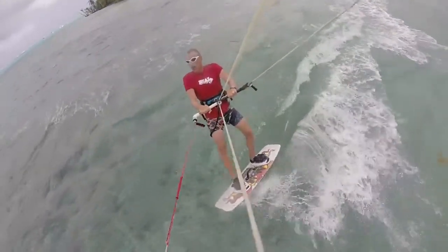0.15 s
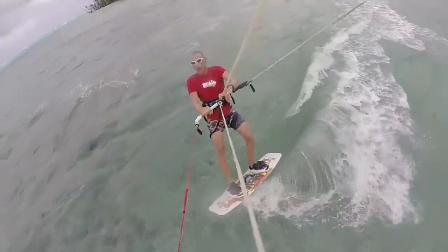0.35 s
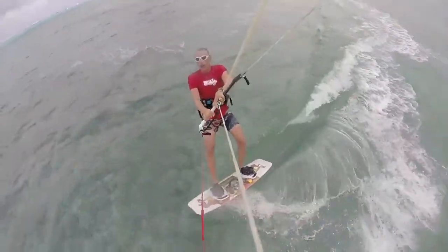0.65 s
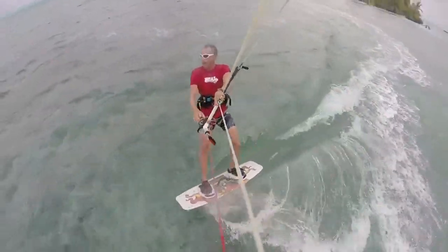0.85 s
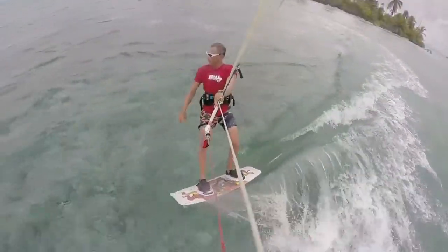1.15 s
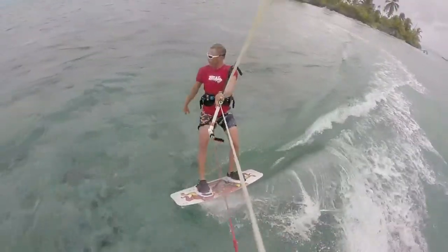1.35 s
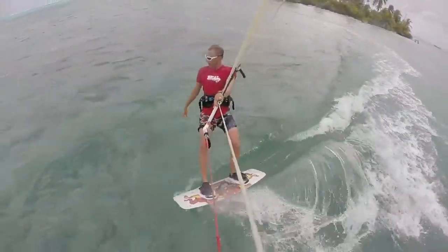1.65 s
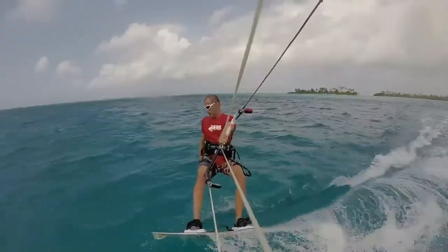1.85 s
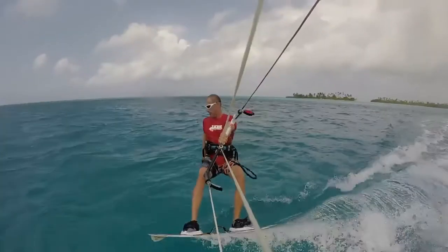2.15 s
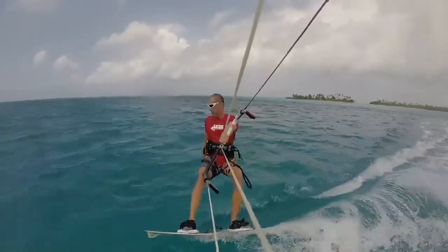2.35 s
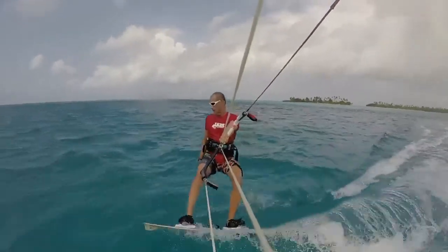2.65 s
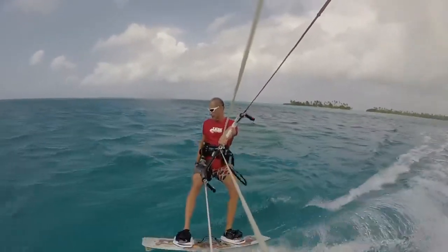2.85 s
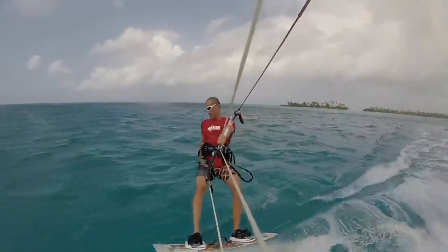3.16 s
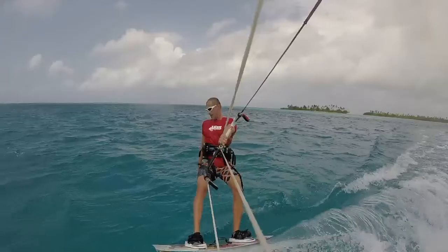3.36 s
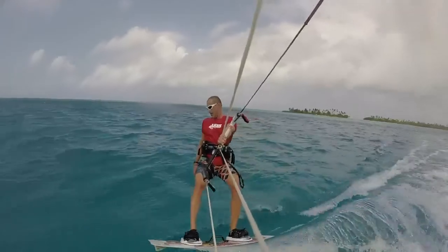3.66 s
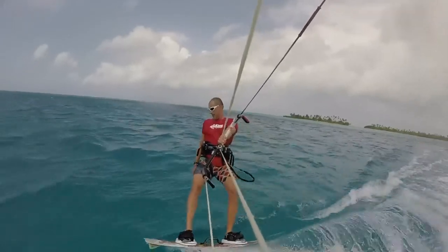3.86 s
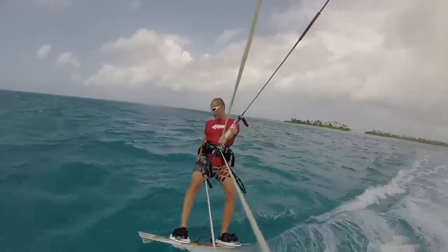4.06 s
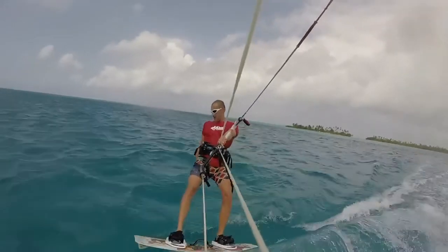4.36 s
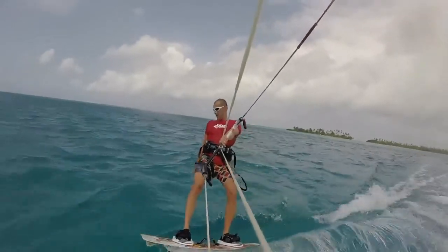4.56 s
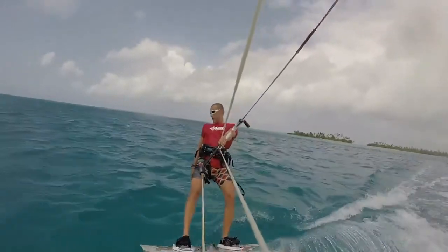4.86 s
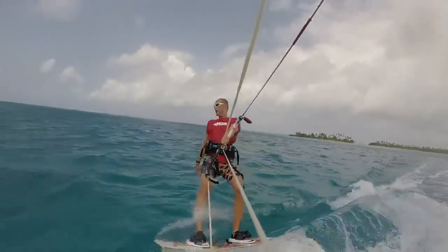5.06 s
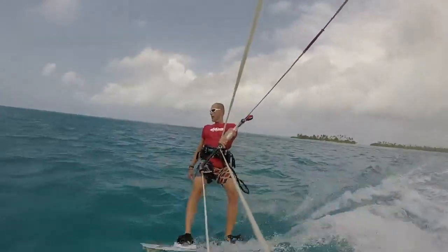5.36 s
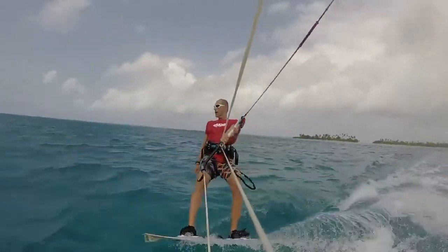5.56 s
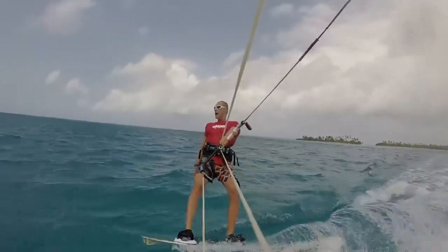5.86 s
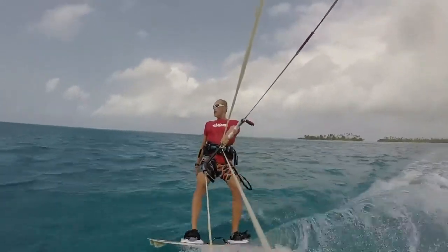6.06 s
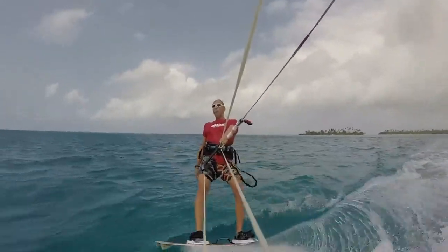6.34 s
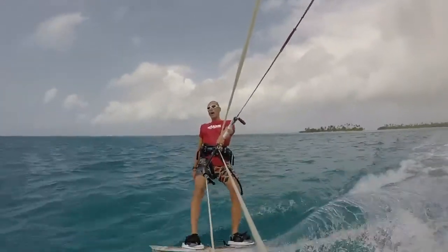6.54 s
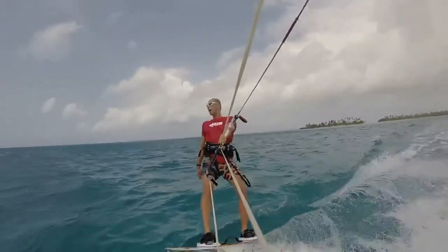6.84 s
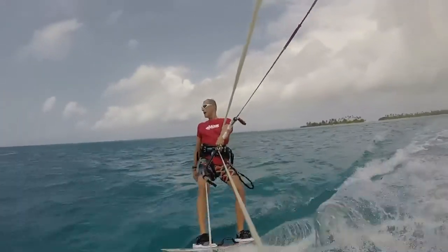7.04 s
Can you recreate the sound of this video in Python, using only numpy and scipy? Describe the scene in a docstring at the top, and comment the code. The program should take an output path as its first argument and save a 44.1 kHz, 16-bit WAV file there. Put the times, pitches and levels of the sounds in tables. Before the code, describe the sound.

Outdoors over open water, a small housed camera on kite lines catches the wind. First, low rumble and dull thumps dominate, with a knock or two from the mount, a faint breathy whistle and hissing spray. A sudden cut brings a louder, wavering whistle in two layers, breathy below and clearer above, over continued buffeting. The whistle slowly sinks as splashes swell in the hiss.

```python
"""Whistling kite lines in a sea wind

Wind over a small housed camera hung on taut kite lines above the sea, in mono.
A thick and a thin line whistle as gliding bands of noise that follow the air speed; part of the thin one
locks to a clear tone. Gusts buffet the housing with low noise and short low swings, tugs ring the mount,
spray hisses in swelling bands, a few drops tick. A cut leads from a calmer stretch to a windier one."""
import sys
import numpy as np
from scipy import signal
from scipy.fft import rfft, irfft
from scipy.io import wavfile
from scipy.ndimage import uniform_filter1d, map_coordinates

SR = 44100
rng = np.random.default_rng(int(sys.argv[2]) if len(sys.argv) > 2 else 0)


def put_to_file(sound):
    """Save the sound as 16-bit audio at rate SR, in the file named by the first command-line argument."""
    columns = np.atleast_2d(sound).T  # one column per channel
    safe = np.clip(columns, -1, 1)
    whole_steps = np.round(safe * 32767)
    wavfile.write(sys.argv[1], SR, whole_steps.astype(np.int16))


N = 317520

CUT_S = 1.755
USUAL_HZ = 2000   # thin line pitch that stands for the usual air speed
# The wind freshens in the calm stretch: [t/s, thin line shedding f/Hz, thick line level/dB, thin line level/dB]
CALM_WIND = [(0, 1410, -31.5, -61), (.3, 1510, -31, -59), (1.1, 1592, -25, -54), (1.38, 1631, -24.5, -43),
             (1.75, 1674, -23, -42)]


def from_db(db):
    """Decibels to gain."""
    return 10 ** (np.asarray(db) / 20)


def rms_one(x):
    """Scale to unit rms."""
    return x / np.sqrt(np.mean(x ** 2) + 1e-20)


def in_time(rows):
    """Draw straight lines through the columns of a timed table, one value per sample."""
    s, *columns = np.transpose(rows)
    return [np.interp(np.arange(N) / SR, s, column) for column in columns]


def across_cut(calm, windy):
    """The calm stretch before the cut, the windy one after, joined within two milliseconds."""
    after = np.clip((np.arange(N) / SR - CUT_S) / .002, 0, 1)
    return (1 - after) * calm + after * windy


def drift(rate_hz):
    """Slow chance: noise twice through a one-pole low-pass at a coarse rate; spread 1."""
    step, settle = 40, 2000   # samples per coarse point; coarse points dropped while the filter settles
    pole = np.exp(-2 * np.pi * rate_hz * step / SR)
    noise = rng.standard_normal(N // step + settle + 2)
    slow = signal.lfilter([1], [1, -2 * pole, pole ** 2], noise)[settle:]
    return np.interp(np.arange(N) / step, np.arange(len(slow)), rms_one(slow - slow.mean()))


def coloured(spectrum, size, rate):
    """Noise shaped by a spectrum, joined straight over log frequency and near silent outside; rms 1."""
    points = np.array(spectrum)
    freq = np.fft.rfftfreq(size, 1 / rate)[1:]
    level_db = np.interp(np.log(freq), np.log(points[:, 0]), points[:, 1], left=-150, right=-150)
    gain = np.r_[0, from_db(level_db)]   # no DC
    return rms_one(irfft(rfft(rng.standard_normal(size)) * gain, size))


def shedding(hz, spread):
    """Noise laid out per shedding cycle and read at the pace of the wind, so the whole band glides."""
    per_cycle = 16   # noise points in one shedding cycle
    wake = coloured(spread, 2 ** 18, per_cycle)
    position = np.cumsum(hz) / SR * per_cycle
    return map_coordinates(wake, [position], order=3, mode="wrap")


def bell(s, length):
    """Bell-shaped swell about a time; length in seconds is its full width at half height."""
    return .5 ** ((2 * (np.arange(N) / SR - s) / length) ** 2)


def bursts(rows, lengths):
    """Sine swings under a bell about each time, phase by chance."""
    t, out = np.arange(N) / SR, np.zeros(N)
    phases = rng.random(len(rows))   # turns
    for (s, peak_db, hz), length, phase in zip(rows, lengths, phases):
        out += from_db(peak_db) * bell(s, length) * np.sin(2 * np.pi * (hz * (t - s) + phase))
    return out


def windy_air():
    """Air speed of the windy stretch: thin line pitch, its moving mean and its eddies in dB about usual."""
    # Air speed as heard in the thin line: [t/s, shedding f/Hz]
    windy_pitch = [(1.76, 2090), (1.9, 2135), (2.09, 2140), (2.2, 2040), (2.33, 2075), (2.42, 1930),
                   (2.48, 1930), (2.57, 2120), (2.66, 2030), (2.8, 2035), (2.98, 2100), (3.14, 2020),
                   (3.27, 2125), (3.38, 2015), (3.45, 2040), (3.55, 1945), (3.83, 1925), (3.94, 2058),
                   (4.05, 1935), (4.17, 2030), (4.37, 1790), (4.48, 1947), (4.93, 1765), (5.05, 1900),
                   (5.14, 1753), (5.38, 1760), (5.49, 1929), (5.6, 1800), (5.82, 1846), (5.95, 1703),
                   (6.1, 1860), (6.45, 1770), (6.8, 1800), (7.0, 1720), (7.2, 1790)]
    half_window_s = .4
    hz, = in_time(windy_pitch)
    air_db = 20 * np.log10(hz / USUAL_HZ)
    mean_db = uniform_filter1d(air_db, size=int(2 * half_window_s * SR), mode="nearest")
    return hz, mean_db, air_db - mean_db


def thick_line():
    """A broad breathy whistle, steep below its pitch, trailing above; light wind sheds less evenly."""
    # Spread of shedding along the line: [multiple of shedding pitch, relative density/dB]
    thick_spread = [(.6, -39), (.72, -29), (.85, -3.5), (1.0, 1), (1.15, -6), (1.35, -18), (1.55, -25),
                    (1.9, -25.5), (2.4, -57)]
    # Level in the mean wind of the windy stretch: [t/s, level/dB]
    thick_windy = [(1.76, -14), (2.4, -16), (3.3, -15), (3.75, -17), (4.2, -17), (4.7, -17.5), (5.3, -19.5),
                   (6.3, -18.5), (7.2, -21)]
    pitch_ratio = 0.5   # to the thin line
    pitch_per_mean, pitch_per_eddy = 1.15, 0.482   # dB of pitch per dB of air speed
    level_per_eddy = 3.1   # dB of level per dB of air speed
    calm_hz, calm_db, _ = in_time(CALM_WIND)
    _, mean_db, eddy_db = windy_air()

    windy_hz = USUAL_HZ * from_db(pitch_per_mean * mean_db + pitch_per_eddy * eddy_db)
    hz = pitch_ratio * across_cut(calm_hz, windy_hz)
    hz = hz * (1 + .02 * drift(6))   # small eddies shake the air speed
    level_db = across_cut(calm_db, in_time(thick_windy)[0] + level_per_eddy * eddy_db)
    level_db = level_db + 0.94 * drift(7.6) + 1.05 * drift(42)

    calm_spread = [(multiple ** 1.044, density_db) for multiple, density_db in thick_spread]   # wider
    wake = across_cut(shedding(hz, calm_spread), shedding(hz, thick_spread))
    return from_db(level_db) * wake


def thin_line():
    """A narrower whistle; at times the line swings along and part of the shedding locks to a clear tone."""
    # Shedding of two strands side by side: [multiple of shedding pitch, relative density/dB]
    thin_spread = [(.82, -42), (.92, -18.5), (.955, -0.5), (1.002, -6), (1.045, -0.5), (1.086, -11.5),
                   (1.2, -26.5), (1.45, -46)]
    # The line swings along: [t/s, length/s, pitch over shedding, locked share of power 0-1, whole line gain/dB]
    locks = [(1.3, .16, .96, .4, 3), (1.8, .3, 1.02, .45, 1), (2.06, .28, 1.008, .7, 2),
             (2.31, .32, .985, .75, 2), (2.6, .32, 1.03, .55, -1.5), (3.16, .28, 1, .55, 2.5),
             (3.48, .32, .985, .6, 3), (3.96, .17, .985, .6, 3), (4.43, .14, 1, .4, 1.5),
             (5.1, .34, .993, .5, 3), (5.86, .22, 1, .45, 3), (7.05, .14, .985, .3, 1.5)]
    lock_edge_s = 0.036
    usual_db = -27   # windy stretch at the usual pitch, before locks and drift
    level_per_mean, level_per_eddy = 6.2, 1.8   # dB of level per dB of air speed
    calm_hz, _, calm_db = in_time(CALM_WIND)
    windy_hz, mean_db, eddy_db = windy_air()
    hz = across_cut(calm_hz, windy_hz)
    level_db = across_cut(calm_db, usual_db + level_per_mean * mean_db + level_per_eddy * eddy_db)

    wobble = 1 + .005 * drift(40)   # on the clear tone only
    turns = np.cumsum(hz * wobble) / SR
    t, tone, locked = np.arange(N) / SR, 0, 0
    for s, length, ratio, share, gain_db in locks:
        hold = np.clip(np.minimum(t - s, s + length - t) / lock_edge_s, 0, 1)
        tone = tone + np.sqrt(share) * hold * np.sin(2 * np.pi * ratio * turns)
        locked = locked + share * hold
        level_db = level_db + gain_db * hold
    tone = np.sqrt(2) * from_db(3.5 * drift(25)) * tone   # root 2 brings a sine to rms 1
    breath = np.sqrt(1 - np.clip(locked, 0, 1)) * shedding(hz, thin_spread)
    return from_db(level_db + 0.56 * drift(8)) * (tone + breath)


def buffeting():
    """Lumpy pressure of turbulent air on the housing: two noise bands, each wavering on its own."""
    # Gusts on the housing: [t/s, low buffet level/dB, upper buffet level/dB]
    gusts = [(0.0, -28.5, -42), (1.72, -28.5, -40), (1.8, -27, -34.5), (3.1, -21.5, -33.5), (3.5, -30, -32),
             (4.69, -25, -36.5), (5.6, -27.5, -33.5), (6.3, -24.5, -36), (7.2, -30.5, -35)]
    # Colour of the low and the upper buffet: [f/Hz, relative density/dB]
    low_colour = [(8.8, -34), (15, -3.5), (33, -4.5), (70, -0.5), (92, -0.5), (116, 0), (178, -13),
                  (220, -22), (290, -45), (480, -120)]
    high_colour = [(120, -22), (170, -4.5), (300, -1.5), (520, -4.5), (700, -11.5), (1400, -21.5),
                   (2500, -22)]
    low_db, high_db = in_time(gusts)
    low = from_db(low_db + 1.77 * drift(17.6)) * coloured(low_colour, N, SR)
    high = from_db(high_db + 1.8 * drift(12.5)) * coloured(high_colour, N, SR)
    return low + high


def spray_level():
    """A slow rise in dB with a bell-shaped swell for each splash."""
    # Sheets of spray thrown up by the board: [t/s, swell/dB, full length at half the swell/s]
    splashes = [(0.661, 2, 0.067), (0.964, 5.5, .2), (1.208, 3.5, 0.17), (1.553, 1, 0.33),
                (1.867, 2.5, 0.11), (2.808, 2, 0.14), (3.214, 4, 0.13), (3.57, 2.5, .1), (4.059, 4, 0.59),
                (4.613, 4.5, 0.18), (5.046, 7, 0.11), (5.176, 8.5, 0.11), (5.703, 4, 0.11),
                (6.594, 4, 0.11), (6.859, 5.5, 0.1), (7.1, 5, 0.073)]
    start_db, rise_db_per_s = -47, 0.62   # before the gain of each stretch
    swells_db = sum(swell_db * bell(s, length) for s, swell_db, length in splashes)
    return start_db + rise_db_per_s * np.arange(N) / SR + swells_db


def spray():
    """Hiss through the housing's resonances, in half-octave bands that swell partly together, partly alone."""
    # Resonant colour of the hiss in each stretch: [f/Hz, relative density/dB]
    calm_colour = [(650, -38), (1100, -10.5), (1190, -2), (1430, -9), (1560, -14), (1820, -3.5),
                   (2470, -4.5), (2790, -15.5), (3040, -13.5), (3390, -16), (5550, -8), (8050, -26),
                   (9380, -19), (11100, -31), (15000, -34)]
    windy_colour = [(1530, 7), (2600, -1), (2860, -4), (3150, -8), (4130, -10.5), (4710, -3), (5260, -11.5),
                    (6700, -14.5), (7370, -21), (8790, -16.5), (9670, -21.5), (10600, -20.5), (11400, -27),
                    (13300, -23.5), (15000, -35)]
    level_db = spray_level()
    mean_db = level_db.mean()
    calm = from_db(4.5) * coloured(calm_colour, N, SR)
    windy = from_db(6.5) * coloured(windy_colour, N, SR)
    lines, freq = rfft(across_cut(calm, windy)), np.fft.rfftfreq(N, 1 / SR)
    together, out = drift(45), 0
    edges = 1000 * 2 ** np.arange(0, 4.1, .5)   # Hz; nothing sounds outside 1-16 kHz
    for low, high in zip(edges, edges[1:]):
        band = irfft(lines * ((freq >= low) & (freq < high)), N)
        # the rise and the splashes show most in the middle treble
        share = np.interp(low, [2000, 3970, 5600, 8000, 12000], [0.57, 0.98, 0.98, .6, .5])
        swell_db = mean_db + share * (level_db - mean_db)
        out = out + from_db(swell_db + 1.03 * together + 0.9 * drift(4.3)) * band
    return out


def thumps():
    """Single heavy gusts rock the housing on its lines: a few low swings for each."""
    # Heavy gusts: [t/s, bell peak level/dB, swing f/Hz, full length at half height/s]
    heavy_gusts = np.array([(0.113, -11.5, 84, 0.035), (0.14, -9.5, 77, 0.056), (0.321, -16, 72, 0.02),
                            (0.349, -14.5, 108, 0.043), (0.544, -12, 96.0, 0.022), (0.844, -16, 88, 0.053),
                            (0.899, -16.5, 127, 0.036), (2.142, -14, 95.1, 0.0073),
                            (2.321, -13.5, 92.9, 0.0109), (2.374, -14.5, 70.9, 0.033),
                            (3.147, -18, 111.2, 0.06), (4.395, -13, 96, 0.021), (4.539, -19.5, 87.7, 0.037),
                            (5.59, -13.5, 83.9, 0.04), (6.146, -16, 87.3, 0.018)])
    return bursts(heavy_gusts[:, :3], heavy_gusts[:, 3])


def mount():
    """Each soft tug sets the modes of the mount ringing, as decaying sines of slightly random strength."""
    # Tugs on the mount: [t/s, strength/dB before the modes and the softening]
    tugs = np.array([(.335, -27), (.352, -19), (0.371, -19), (0.393, -18), (0.411, -32), (0.464, -32.5),
                     (0.529, -25), (0.847, -28.5), (.87, -30)])
    # Modes of the mount: [f/Hz, relative level/dB before the softening, t60/s]
    modes = [(210.1, 2, 0.061), (281, -1, 0.12), (397, -4.5, 0.15), (1320, -3.5, .1)]
    at, out = [round(s * SR) for s in tugs[:, 0]], np.zeros(N)
    chance_db = rng.normal(0, 1.9, (len(tugs), len(modes)))
    for k, (hz, level_db, t60) in enumerate(modes):
        clicks = np.full(N, 1e-18)   # a trace of input keeps the filter out of very slow tiny numbers
        clicks[at] = from_db(tugs[:, 1] + level_db + chance_db[:, k])
        decay, w = from_db(-60 / (t60 * SR)), 2 * np.pi * hz / SR
        out += signal.lfilter([0, np.sin(w)], [1, -2 * decay * np.cos(w), decay ** 2], clicks)
    return signal.sosfilt(signal.butter(2, 500, fs=SR, output="sos"), out)   # a soft contact


def drops():
    """A short bright tick for each drop that hits the housing."""
    # Drops: [t/s, bell peak level/dB, f/Hz]
    hits = [(4.988, -27, 4900), (5.148, -26, 5400), (5.186, -22, 6800), (5.209, -29, 5600)]
    return bursts(hits, np.full(len(hits), .0004))   # full length at half height, s


def scene():
    """Lines, gusts, spray, mount and drops summed at one microphone."""
    lines = thick_line() + thin_line()
    housing = buffeting() + thumps() + mount()
    water = spray() + drops()
    return (lines + housing + water)[None]


def record(dry):
    """A steep elliptic low-pass cuts the top treble."""
    cutoff_hz = 15165
    return signal.sosfilt(signal.ellip(10, .5, 70, cutoff_hz, fs=SR, output="sos"), dry)


dry = scene()
out = record(dry)
put_to_file(out)
```